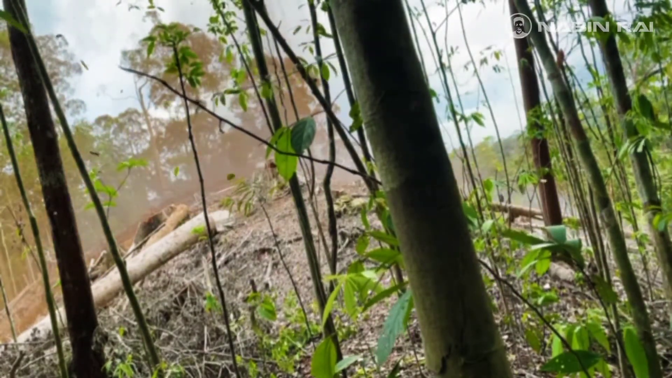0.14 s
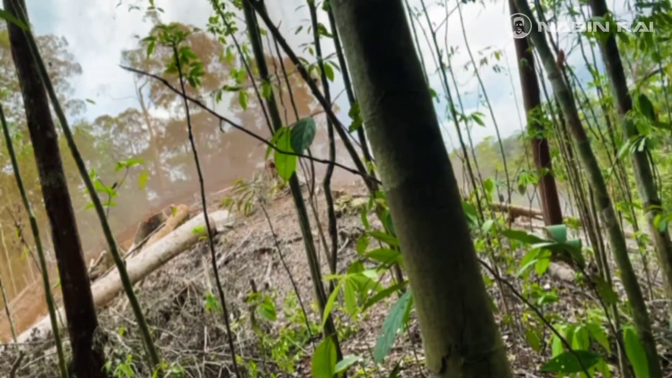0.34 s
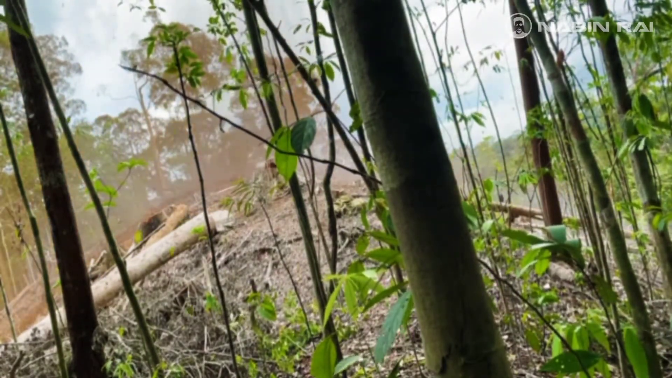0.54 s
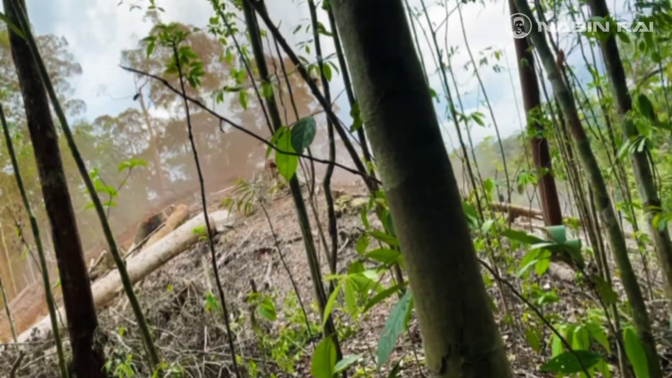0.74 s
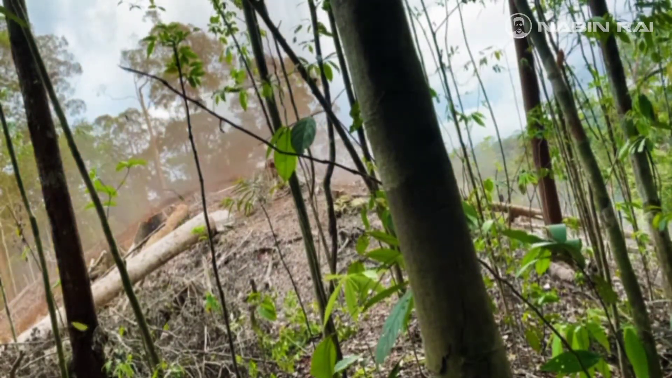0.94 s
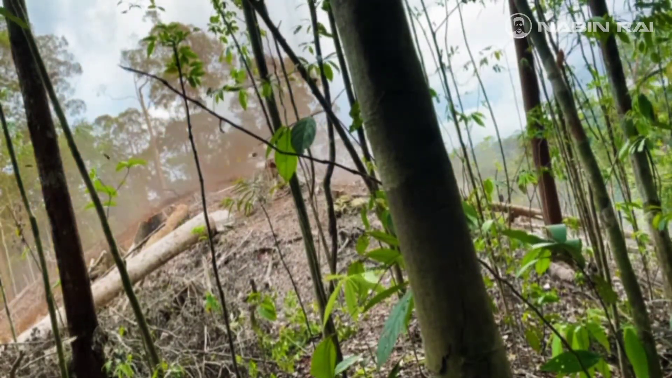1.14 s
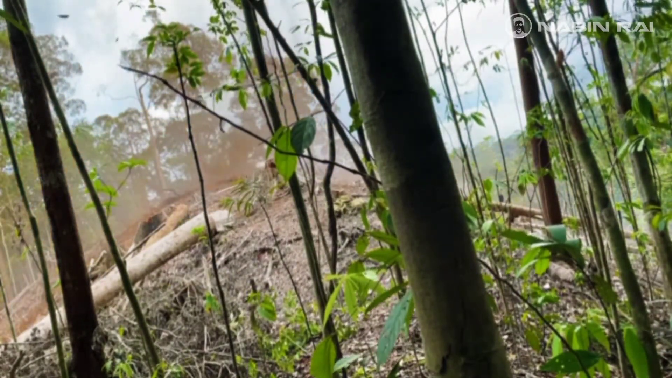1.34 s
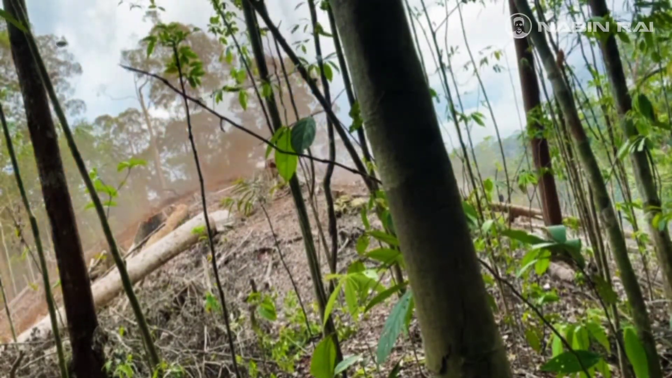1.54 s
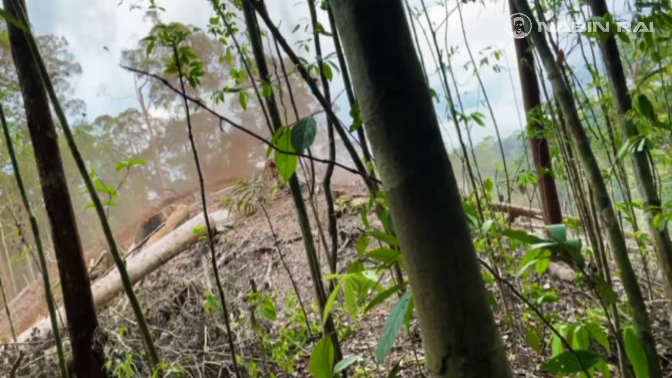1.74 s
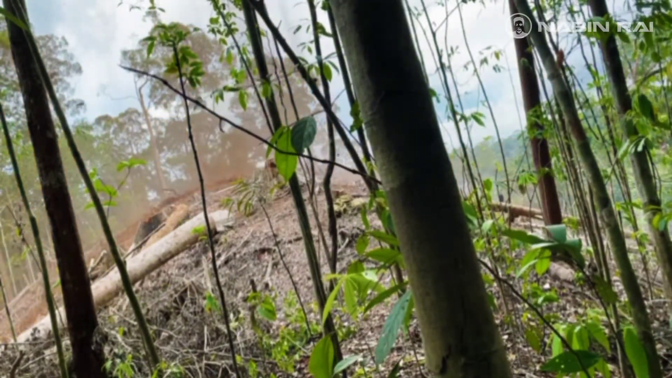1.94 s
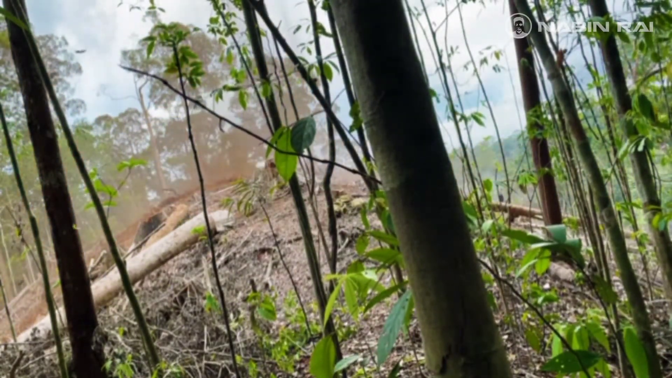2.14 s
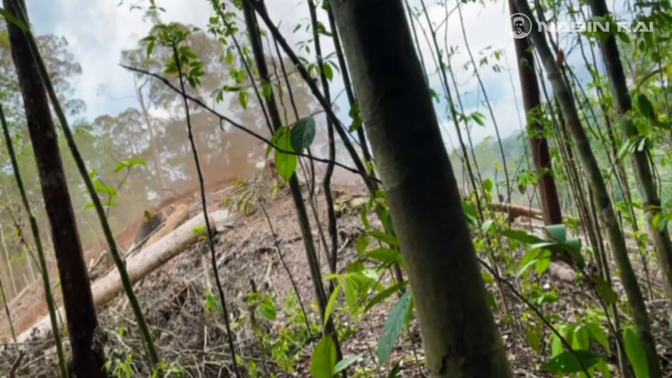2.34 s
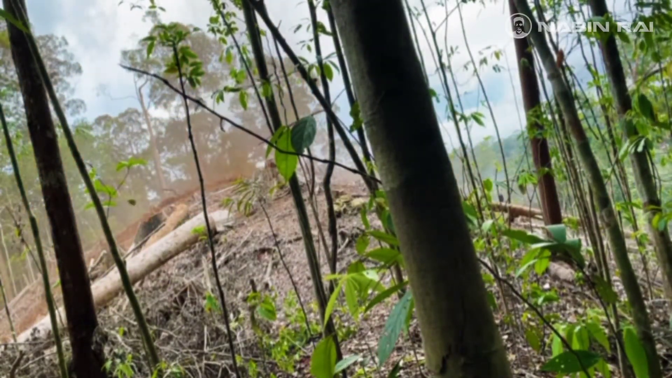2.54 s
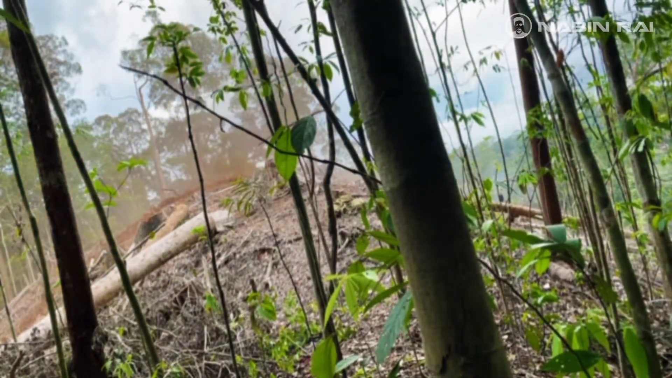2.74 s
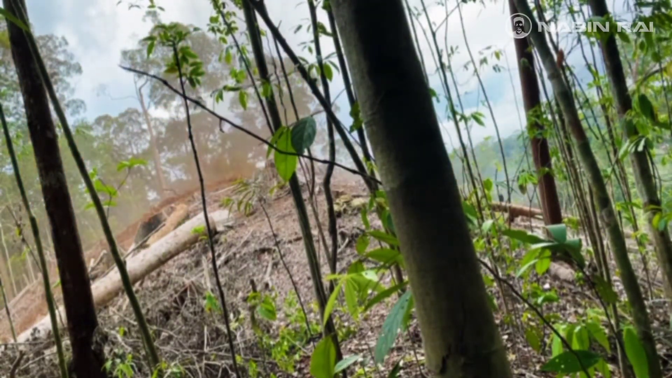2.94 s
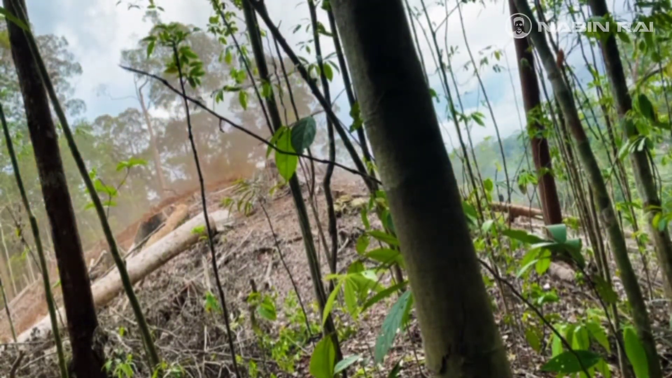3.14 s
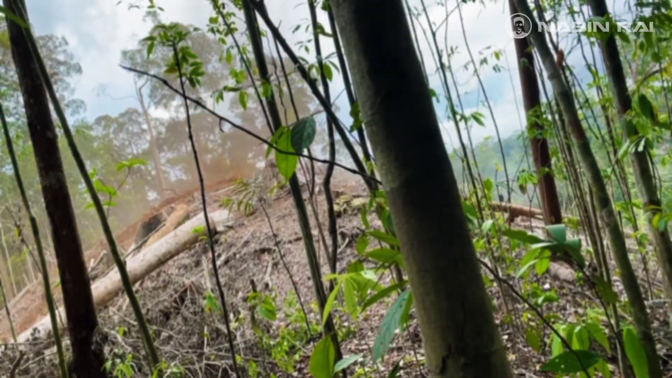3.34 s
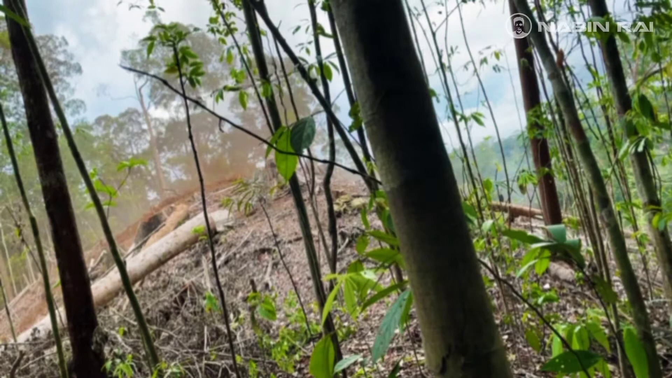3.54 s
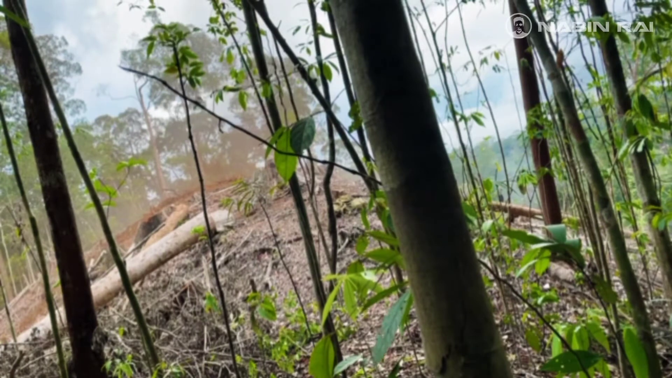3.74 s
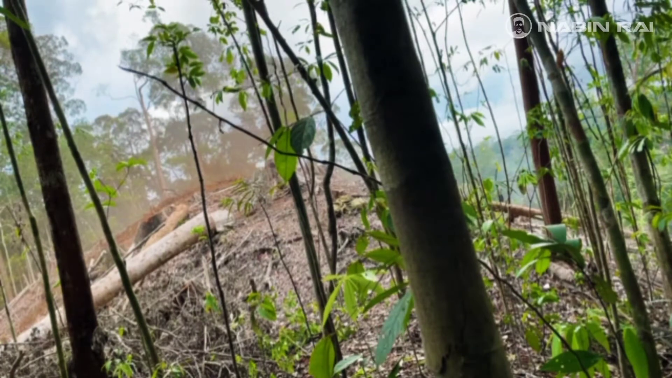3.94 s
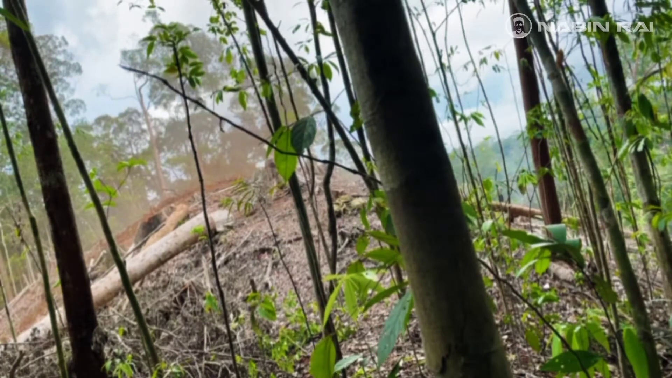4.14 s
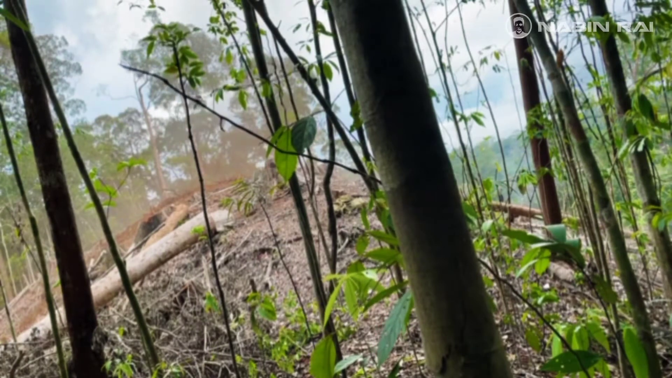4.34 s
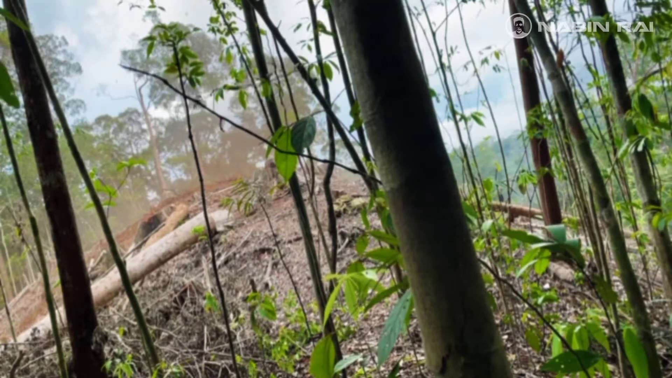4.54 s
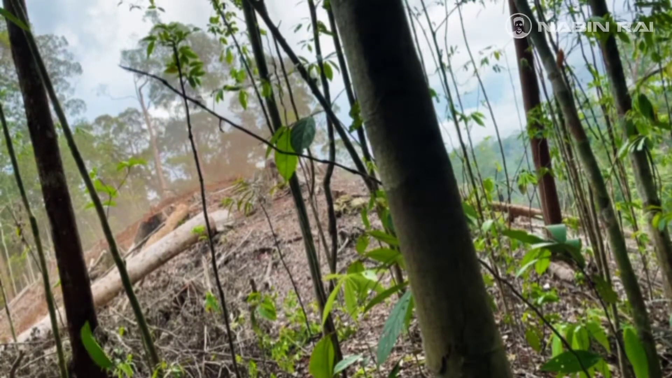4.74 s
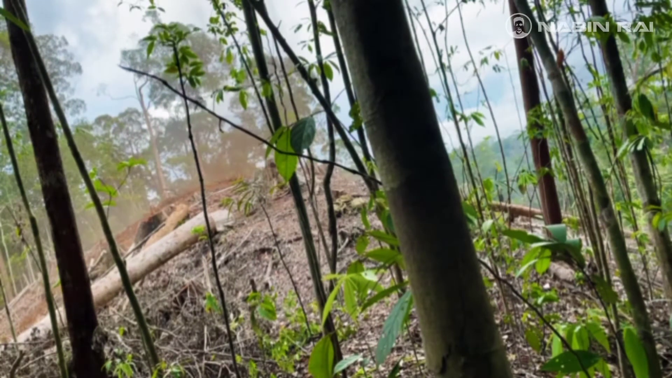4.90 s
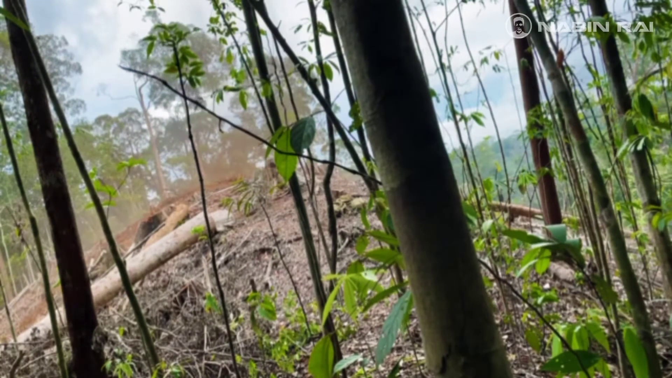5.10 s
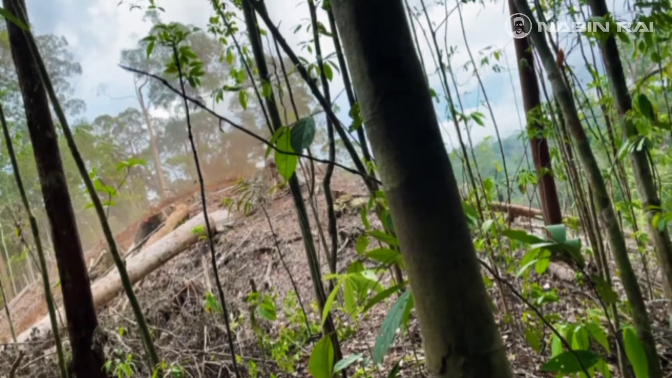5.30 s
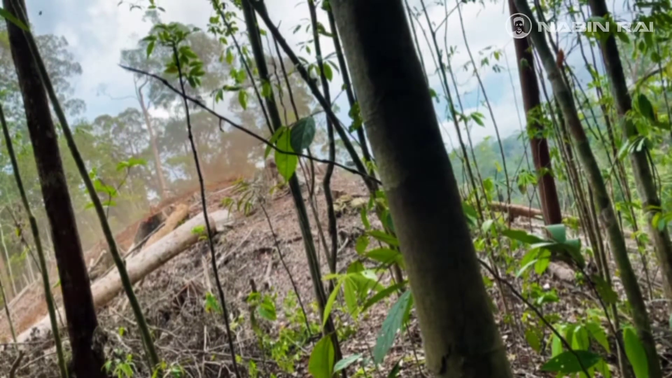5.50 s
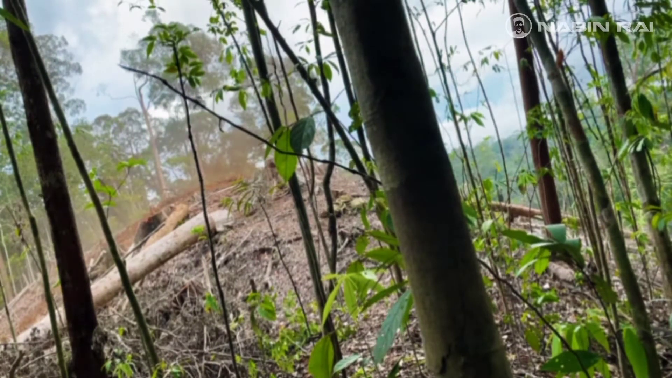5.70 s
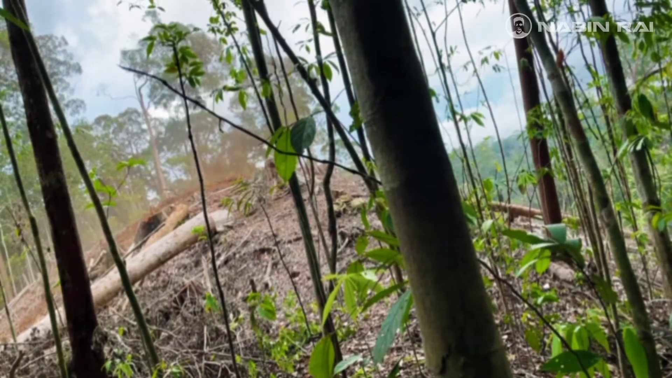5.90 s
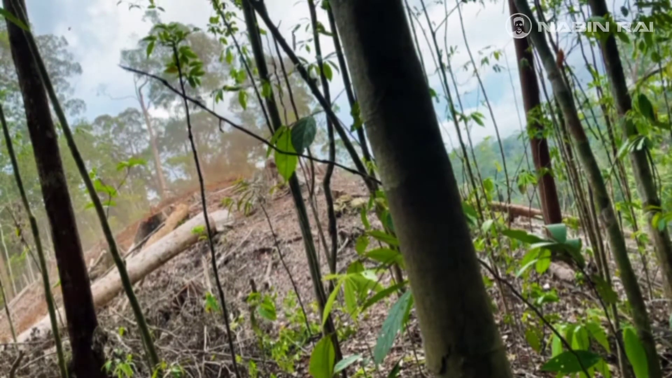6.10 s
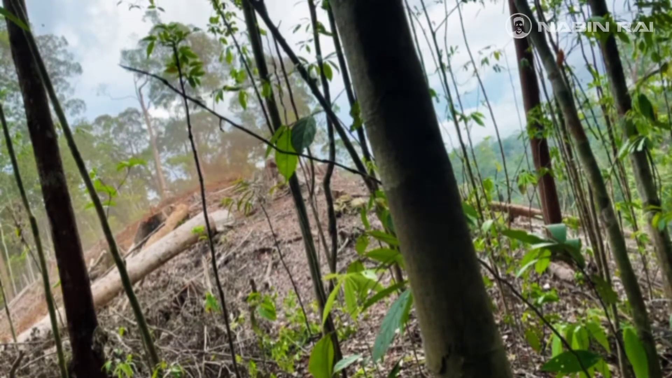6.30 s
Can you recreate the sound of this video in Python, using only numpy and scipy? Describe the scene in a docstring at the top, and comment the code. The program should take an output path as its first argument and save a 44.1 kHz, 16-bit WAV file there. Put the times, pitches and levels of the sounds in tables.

```python
"""Earth thrown up by a blast rains back on a jungle clearing, heard all round a two-port microphone.
Rumble, patter and grit are random clicks over noise, filtered in bands; sticks and leaves ring as resonators.
Near clods thud as damped low swings, lumps burst in sprays of crumbs and pebbles tick as short rings.
The fall is densest at first and thins out, the fine grit hissing longest.
A faint, steady forest drone of filtered noise comes through at the end."""
import sys
import numpy as np
from scipy import signal
from scipy.fft import rfft, irfft, next_fast_len
from scipy.io import wavfile

SR = 44100
rng = np.random.default_rng(int(sys.argv[2]) if len(sys.argv) > 2 else 0)


def wav_record(signal):
    """Record a signal, one row per channel, as 16-bit PCM in the file named by sys.argv[1]."""
    frames = np.transpose(np.atleast_2d(signal))
    bounded = np.clip(frames, -1, 1)
    # unit amplitude maps onto the largest positive 16-bit level
    quanta = np.round(bounded * 32767).astype(np.int16)
    wavfile.write(sys.argv[1], SR, quanta)


N = 280476
TIME = np.arange(N) / SR   # s
# limits of the neighbouring bands in which debris is built, in Hz
BAND_EDGES_HZ = np.r_[np.geomspace(22, 5000, 16), 5800, 6700, 8300, 10000, 12000, 13500, 16500]

# Colour of the heavy earth. Each row: pitch in Hz, relative level in dB per Hz.
RUMBLE_COLOUR = [(25, -19), (40, -12), (60, 1.5), (85, -2.5), (150, -1), (230, -7), (400, -25), (900, -70)]
# Colour of the clods and sticks. Each row: pitch in Hz, relative level in dB per Hz.
PATTER_COLOUR = [(120, -0.5), (250, 0), (380, -1.5), (500, 0), (750, -3.5), (1100, -5.5), (1700, -7),
                 (3000, -9), (6000, -20), (15000, -74)]
# Colour of the fine grit and leaves. Each row: pitch in Hz, relative level in dB per Hz.
GRIT_COLOUR = [(600, -16), (1300, -4.5), (2200, -3.5), (3400, 1.5), (5000, -2), (7000, 0), (9500, -4.5),
               (12000, -14.5), (15000, -4)]
# Heavy clods landing close by. Each row: start in seconds, envelope peak in dB, pitch in Hz.
CLOD_THUDS = [(0.021, -20, 70.4), (.050, -22, 160), (.099, -18, 70), (.116, -18, 71), (0.144, -19, 73.7),
              (0.2112, -11, 161), (0.221, -12.5, 85), (.236, -18.5, 160), (0.265, -21.5, 90),
              (.296, -20, 86), (.342, -16, 206), (.359, -21.5, 80), (.433, -19, 190), (.541, -18, 175),
              (.695, -20, 88), (.728, -22, 90), (0.8549, -9.5, 210), (0.8593, -9, 80), (0.879, -21, 85),
              (.889, -18, 190), (.897, -23, 72), (.912, -16, 168), (.925, -23, 76), (1.241, -17.5, 212),
              (1.271, -19, 75), (1.293, -21, 198), (1.4415, -18.5, 72), (1.465, -19, 83),
              (1.643, -16.5, 61.6), (1.812, -14.5, 160), (2.0398, -9, 73), (2.0438, -12.5, 140),
              (2.077, -23, 78), (2.098, -20, 80), (2.129, -20, 175), (2.224, -22, 160), (2.716, -25, 84),
              (2.898, -28, 92), (2.978, -30, 78), (3.162, -27, 190), (3.463, -29, 163), (3.877, -32.5, 65),
              (4.590, -31, 160), (5.153, -32, 280), (6.243, -25, 55), (6.276, -31, 60.6)]
# Lumps bursting in the leaves or spilling over the ground. Each row: start in seconds,
# level in dB before the rise and decay act, rise in seconds, decay in seconds, treble tilt in dB per octave.
LUMP_BURSTS = [(.112, -28, 0.0044, 0.02, 3), (.115, -29.5, .003, 0.39, -1), (.328, -23, 0.0029, 0.015, -2),
               (.430, -18, 0.0026, 0.012, -2.5), (.521, -27, .0024, 0.011, 5),
               (0.656, -19, .005, 0.045, -2), (.680, -22.5, 0.0034, 0.036, 1.5),
               (.730, -23, 0.0032, 0.023, -4), (0.8356, -17, .0008, 0.022, 0.3),
               (.849, -15.5, 0.004, 0.02, 0.5), (.875, -22.5, .003, 0.043, 1.5),
               (1.592, -21.5, 0.0027, 0.026, -2.5), (2.018, -26, .003, 0.051, -4),
               (2.08, -19.5, 0.0021, 0.027, -4.5), (2.10, -27, .025, 0.19, -7),
               (2.921, -25.5, 0.0027, 0.02, -3.5), (4.116, -23.5, 0.0037, 0.018, 2.5),
               (5.105, -19, 0.009, 0.013, 1), (5.142, -30.5, .0024, 0.02, -1),
               (5.928, -38, .002, 0.018, -2.5), (6.272, -29.5, .006, .012, 7)]
# Colour of the bursts before their tilt. Each row: pitch in Hz, relative level in dB per Hz.
CRUMB_COLOUR = [(150, -11), (280, -8), (500, 2.5), (1500, 0), (3000, -2.5), (6000, -2), (10000, -5),
                (15000, -15.5)]
# Nearest pebbles and small clods on stems and logs. Each row: start in seconds, level in dB,
# pitch in Hz, build-up of the ring in cycles, left minus right in dB.
PEBBLE_TICKS = [(.126, -15, 5000, .9, 5), (.166, -16, 504, .6, 0), (.1665, -13, 1420, 1.2, -1),
                (.207, -15.5, 775, .8, -1), (.229, -15, 1250, 1.1, 3), (.307, -12.5, 875, 0.74, 5),
                (.331, -10.5, 2900, 1.1, -7), (.345, -14, 606, 0.75, -3), (.448, -12, 2800, 0.69, 0),
                (.523, -8, 4230, 0.96, -8), (.586, -15, 546, .9, 0), (.664, -15.5, 380, .8, -1),
                (.666, -16, 1700, 1.2, 4), (.667, -17, 850, .8, 0), (.681, -18, 2300, .7, 5),
                (.685, -12, 460, 0.66, 0), (.686, -14, 1050, 0.59, 0), (.712, -17, 520, .8, 0),
                (.732, -15, 700, 0.54, 0), (.741, -15.5, 433, 1.4, -2), (.743, -12, 2400, 1.1, 0),
                (.758, -18, 450, 0.71, 0), (.8365, -10, 1790, 1.1, -1), (.837, -15.5, 900, 0.73, 0),
                (.847, -12, 1650, 1.2, 0), (.852, -16, 700, 0.49, 0), (.8805, -13.5, 1000, 1.1, 6),
                (1.004, -18, 610, .9, 4), (1.208, -19, 1250, .7, -3), (1.353, -15.5, 3700, 1.2, 0),
                (1.3912, -12, 2520, 0.65, 0), (1.392, -20, 1200, .7, 0), (1.3938, -12, 2600, 0.74, -1),
                (1.424, -20, 494, 1, -2), (1.443, -17, 1900, .8, 0), (1.449, -17, 1500, 0.8, 0),
                (1.522, -18, 1260, .8, -3), (1.596, -20, 3900, .9, 3), (1.606, -20, 1260, 0.64, -7),
                (1.610, -18, 640, 1.1, -3), (1.815, -15, 1140, 0.85, -3), (1.896, -14, 2600, 0.68, 1),
                (1.956, -14, 2300, .6, 2), (1.975, -13, 3500, .8, 3), (2.033, -20, 1450, 0.52, -2),
                (2.047, -19, 1270, .7, 0), (2.082, -15, 3200, 0.72, -3), (2.085, -15.5, 690, 0.98, 0),
                (2.092, -17, 2960, 1.3, -3), (2.094, -17, 430, 1.1, -1), (2.219, -20, 2200, 1, -1),
                (2.335, -19, 2530, .8, -6), (2.380, -15, 2600, .7, 3), (2.410, -17.5, 487, 1.1, -3),
                (2.559, -20, 1200, 0.74, -3), (2.6935, -13, 3900, 1, 0), (2.7455, -18.5, 1750, 1.3, -2),
                (2.839, -15, 2440, 1.2, 0), (2.901, -18.5, 845, 0.66, 5), (2.9255, -15, 2250, 0.73, 2),
                (3.029, -18.5, 1200, .8, -5), (3.0708, -10.5, 1190, 0.86, -5), (3.132, -18, 5070, 0.65, 0),
                (3.242, -18, 4040, 1.3, -2), (3.324, -29, 750, 0.78, -4), (3.396, -24, 1450, .7, -2),
                (3.592, -20, 2200, .6, 0), (3.656, -23.5, 530, 0.99, 0), (3.666, -19, 4300, 1.2, -4),
                (3.840, -23, 6000, 0.83, 2), (3.848, -27, 1160, 0.61, -8), (3.8625, -17, 3280, 1.5, 0),
                (3.910, -21, 1850, .6, -5), (4.036, -29, 530, 1.4, 1), (4.202, -22, 2740, .8, 0),
                (4.258, -18, 4700, 1.6, -10), (4.260, -26, 540, 0.93, -1), (4.395, -25, 2740, 0.74, -8),
                (4.555, -17, 5200, 2, 1), (4.896, -34, 1850, 1.5, 0), (5.0302, -10, 2750, 0.95, -3),
                (5.112, -28.5, 670, 1.3, 5), (5.115, -23, 1700, 0.73, 3), (5.1473, -20.5, 440, 0.66, 0),
                (5.245, -30, 1460, 0.73, -2), (5.467, -32, 1100, .7, -3), (5.686, -24, 1900, 1, -1),
                (5.755, -26, 2000, .8, -10), (5.9242, -19, 1650, 0.92, -8), (5.946, -26, 2700, .6, 1.5),
                (6.206, -25.5, 1770, 1.2, -8), (6.2805, -23, 3480, 2.5, -2)]
# Far-off forest. Each row: centre in Hz, width in Hz, rms level in dB.
FOREST_BANDS = [(175, 150, -52), (1003, 200, -49.5), (1680, 170, -59), (4800, 1100, -50),
                (10300, 3000, -48)]
# Stereo image at the microphone. Each row: pitch in Hz, likeness of left and right from 0 to 1.
PORT_LIKENESS = [(60, 0.97), (150, 0.92), (300, 0.67), (600, 0.1), (1100, 0.34), (2400, 0.25), (3600, 0.47),
                 (4800, 0.54), (6000, 0.64), (7500, 1), (9200, 0.3), (11000, 1), (15000, 0.95)]
# Phase by which the right port leads the left. Each row: pitch in Hz, lead in turns.
RIGHT_PORT_LEAD = [(0, 0), (850, .28), (1200, .26), (2100, .03), (3000, -.13), (3900, 0), (5400, 0),
                   (6700, .48), (8100, .52), (9400, .72), (10100, .98), (12200, 1.03), (13300, 1.5)]
# Level gap between the ports. Each row: pitch in Hz, left minus right in dB.
PORT_LEVEL_GAP = [(60, 1.5), (110, 0.5), (200, 1), (360, 0.5), (650, -1), (1190, -1.5), (1550, -1.5),
                  (1830, -1.5), (2160, 0.5), (3920, 0.5), (4700, 2), (5200, 0.5), (6000, 3), (7130, 1.5),
                  (13000, 0)]

# the dense first wave: extra level, the moment it is half gone in dB, and how gradually it ebbs
FIRST_WAVE_DB, FIRST_WAVE_END_S, FIRST_WAVE_EBB_S = 2, 0.9, 0.14
THINNING_S = 1.57   # time scale on which stragglers thin out once the bulk is down
# each size of debris: level without the first wave, steady fade, time its bulk is down,
# loss each time (1 + time since then / THINNING_S) doubles
RUMBLE_DB, RUMBLE_FADE_DB_PER_S, RUMBLE_DOWN_S, RUMBLE_THINNING_DB = -32.5, 0.08, 2.4, 4.5
PATTER_DB, PATTER_FADE_DB_PER_S, PATTER_DOWN_S, PATTER_THINNING_DB = -26.5, -0.01, 2.3, 10.5
GRIT_DB, GRIT_FADE_DB_PER_S, GRIT_DOWN_S, GRIT_THINNING_DB = -28.5, 0.6859, 3.56, 2
# further pebbles: rate, level without the first wave, spread to either side of it, range of pitch
STRAYS_PER_S, STRAY_DB, STRAY_SPREAD_DB, STRAY_LOW_HZ, STRAY_HIGH_HZ = 27, -24, 3.5, 448, 4350
STRAY_FADE_DB_PER_S, STRAY_THINNING_DB = 3.5, 4
STRAY_CYCLES = 0.99   # middle value of the build-up of their ring
STRAY_PAN_DB = 8   # greatest level gap between the sides


def from_db(db):
    """Decibels to gain."""
    return 10 ** (np.asarray(db) / 20)


def rms_one(x):
    """Scale to rms 1."""
    return x / np.sqrt(np.mean(x ** 2) + 1e-20)


def at_hz(points, hz):
    """Read a table on a log-frequency axis."""
    freqs, values = np.transpose(points)
    return np.interp(np.log(hz), np.log(freqs), values)


def drift(rate_hz):
    """Random wander of spread about 1: noise through a two-pole low-pass at the given rate."""
    step = 40   # samples between the points computed
    pole = np.exp(-2 * np.pi * rate_hz * step / SR)
    noise = rng.standard_normal(N // step + 2002)
    slow = signal.lfilter([1], [1, -2 * pole, pole * pole], noise)[2000:]   # settled part
    return np.interp(np.arange(N) / step, np.arange(len(slow)), rms_one(slow))


def band(x, low, high):
    """Causal band-pass."""
    sections = signal.butter(2, [low, min(high, .45 * SR)], "band", fs=SR, output="sos")
    return signal.sosfilt(sections, x + 1e-18)


def spread(pair, hz):
    """Two unrelated signals become left and right, as alike as the ports hear that pitch."""
    alike = np.clip(at_hz(PORT_LIKENESS, hz), 0, .995)
    middle = np.sqrt(1 + alike) * pair[0]
    side = np.sqrt(1 - alike) * pair[1]
    return middle + side * np.array([[1], [-1]])


def impacts(per_s, size_db):
    """Two channels of clicks at random times: many small or far, a few large or near; rms 1."""
    at = np.flatnonzero(rng.random(N) < per_s / SR)
    size = from_db(size_db * np.minimum(rng.exponential(1, len(at)), 4.5))
    bearing = rng.uniform(0, 2 * np.pi, len(at))
    clicks = np.zeros((2, N))
    clicks[:, at] = size * np.array([np.cos(bearing), np.sin(bearing)])
    return rms_one(clicks)


def swing(t, hz, swell_s):
    """A damped swing whose envelope builds up to 1 while the contact lasts, then dies away."""
    envelope = (t / swell_s) ** 2 * np.exp(2 - 2 * t / swell_s)
    return envelope * np.sin(2 * np.pi * hz * t)


def falling(t, db, fade_db_per_s, down_s, thinning_db):
    """Gain of one size of debris: dense first wave, steady slope, power-law thinning once its bulk is down."""
    first_wave = FIRST_WAVE_DB * (1 - np.tanh((t - FIRST_WAVE_END_S) / FIRST_WAVE_EBB_S)) / 2
    doublings = np.log2(1 + np.maximum(t - down_s, 0) / THINNING_S)
    return from_db(db + first_wave - fade_db_per_s * t - thinning_db * doublings)


def shower(colour, per_s, size_db, wash_db, clump_db, patchy_db):
    """Impacts, each sounding over about two bands, on the smooth wash of countless far ones; rms 1."""
    out = np.zeros((2, N))
    clumps = drift(16.4)
    wash = rng.standard_normal((2, 2, N))
    lower = impacts(per_s, size_db)
    for k, (low, high) in enumerate(zip(BAND_EDGES_HZ, BAND_EDGES_HZ[1:])):
        hz = np.sqrt(low * high)
        if not colour[0][0] / 2 < hz < colour[-1][0] * 2:
            continue
        upper = impacts(per_s, size_db)   # shared with the next band up
        drive = (lower + upper) * (-1) ** k + from_db(wash_db) * wash[k % 2]
        level = from_db(at_hz(colour, hz) + patchy_db * drift(6.7))
        out += level * band(spread(drive, hz), low, high)
        lower = upper
    return rms_one(out * from_db(clump_db * clumps))


def twigs(colour, low_hz, high_hz, per_s, cycles, size_db, count):
    """Struck twigs and dry leaves ring briefly as resonators, each at its own pitch; rms 1."""
    out = np.zeros((2, N))
    for hz in np.geomspace(low_hz, high_hz, count):
        pole = np.exp(-hz / (cycles * SR))
        turn = 2 * np.pi * hz / SR
        strikes = spread(impacts(per_s / count, size_db), hz) + 1e-18
        ring = signal.lfilter([1, 0, -1], [1, -2 * pole * np.cos(turn), pole * pole], strikes)
        out += from_db(at_hz(colour, hz)) * np.sqrt(hz) * rms_one(ring)
    return rms_one(out)


def strays():
    """Further pebbles tick with random moment, size, pitch and side, growing fainter as the fall thins."""
    when, size, pitch, ring, side = rng.random((int(STRAYS_PER_S * N / SR), 5)).T
    level_db = STRAY_SPREAD_DB * (2 * size - 1)
    hz = STRAY_LOW_HZ * (STRAY_HIGH_HZ / STRAY_LOW_HZ) ** pitch
    cycles = STRAY_CYCLES * (.5 + ring)
    pan_db = STRAY_PAN_DB * (2 * side - 1)
    pebbles = zip(when * TIME[-1], level_db, hz, cycles, pan_db)
    fall = falling(TIME, STRAY_DB, STRAY_FADE_DB_PER_S, PATTER_DOWN_S, STRAY_THINNING_DB)
    return fall * ticks(pebbles)


def forest():
    """Distant drone and shrill: a few steady bands of noise."""
    out = np.zeros((2, N))
    for hz, width, db in FOREST_BANDS:
        noise = spread(rng.standard_normal((2, N)), hz)
        out += from_db(db) * rms_one(band(noise, max(hz - width / 2, 20), hz + width / 2))
    return out


def thuds(swell_cycles=0.55):
    """A clod pushes the soft ground, which swings once or twice and stops; lower ones swing slower."""
    out = np.zeros(N)
    for start, db, hz in CLOD_THUDS:
        place = out[int(start * SR):][:SR // 4]
        place -= from_db(db) * swing(TIME[:len(place)], hz, swell_cycles / hz)   # first push is negative
    return out


def bursts(crumbs_per_s=4200, crumb_db=3.5):
    """A lump breaks into a spray of crumbs that dies away; its treble tilt sets how bright it sounds."""
    centres = np.sqrt(BAND_EDGES_HZ[1:] * BAND_EDGES_HZ[:-1])[4:]
    lows, highs = BAND_EDGES_HZ[-len(centres) - 1:-1], BAND_EDGES_HZ[-len(centres):]
    out, power, t = np.zeros((2, N)), np.zeros((len(centres), N)), TIME[:SR]
    for start, db, rise, decay, tilt in LUMP_BURSTS:
        colour = from_db(at_hz(CRUMB_COLOUR, centres) + tilt * np.log2(centres)) ** 2
        colour /= np.sum(colour * (highs - lows)) / (SR / 2)   # tilt leaves the total power alone
        shape = from_db(db) * (1 - np.exp(-t / rise)) * np.exp(-t / decay)
        place = power[:, int(start * SR):][:, :len(t)]
        place += np.outer(colour, shape ** 2)[:, :place.shape[1]]
    crumbs = [impacts(crumbs_per_s, crumb_db), impacts(crumbs_per_s, crumb_db)]
    for k, hz in enumerate(centres):
        spray = spread(crumbs[k % 2], hz) * np.sqrt(power[k])
        out += band(spray, lows[k], highs[k])
    return out


def ticks(pebbles, rebound_s=0.00326, rebound_db=-12, scatter_db=-20, scatter_s=0.014, scatter_octaves=0.85):
    """Damp wood rings for a few cycles, the pebble rebounds once, and stems and leaves scatter a short tail."""
    out, t = np.zeros((2, N)), TIME[:SR // 10]
    reach = 2 ** (scatter_octaves / 2)
    for start, db, hz, cycles, pan_db in pebbles:
        strike = swing(t, hz, cycles / hz)
        rebound = swing(np.maximum(t - rebound_s, 0), hz, cycles / hz)
        knock = strike + from_db(rebound_db) * rebound
        sides = rms_one(from_db([[pan_db / 2], [-pan_db / 2]]))
        noise = band(rng.standard_normal((2, len(t))), hz / reach, hz * reach)
        tail = rms_one(noise) * np.exp(-t / scatter_s)
        tick = from_db(db) * (sides * knock + from_db(scatter_db) * tail)
        place = out[:, int(start * SR):][:, :len(t)]
        place += tick[:, :place.shape[1]]
    return out


def across_ports(sound):
    """Sound from all round reaches the two microphone ports with a phase gap that changes with pitch."""
    size = next_fast_len(N + SR // 10)
    hz = np.arange(size // 2 + 1) * SR / size
    turns = np.interp(hz, *np.transpose(RIGHT_PORT_LEAD))
    shift = np.exp(-1j * np.pi * turns * np.array([[1], [-1]]))   # half the gap on each side
    return irfft(rfft(sound, size) * shift, size)[:, :N]


def scene(sticks_db=-4.5, leaves_db=-7):
    """Earth, clods and grit fall together; the grit is the last to thin out, over the far forest."""
    earth = falling(TIME, RUMBLE_DB, RUMBLE_FADE_DB_PER_S, RUMBLE_DOWN_S, RUMBLE_THINNING_DB)
    clods = falling(TIME, PATTER_DB, PATTER_FADE_DB_PER_S, PATTER_DOWN_S, PATTER_THINNING_DB)
    fines = falling(TIME, GRIT_DB, GRIT_FADE_DB_PER_S, GRIT_DOWN_S, GRIT_THINNING_DB)
    rumble = earth * shower(RUMBLE_COLOUR, per_s=120, size_db=2.0, wash_db=1.5, clump_db=1.5, patchy_db=1.0)
    patter = clods * shower(PATTER_COLOUR, per_s=300, size_db=3.0, wash_db=1, clump_db=1.08, patchy_db=0.0)
    struck_sticks = twigs(PATTER_COLOUR, 328.9, 1909, per_s=500, cycles=16.0, size_db=1.0, count=36)
    sticks = clods * from_db(sticks_db) * struck_sticks
    grit = fines * shower(GRIT_COLOUR, per_s=700, size_db=1.0, wash_db=3.5, clump_db=1.0, patchy_db=1.7)
    struck_leaves = twigs(GRIT_COLOUR, 1797, 6804, per_s=1000, cycles=53.0, size_db=1.9, count=44)
    leaves = fines * from_db(leaves_db) * struck_leaves
    around = rumble + patter + sticks + grit + leaves + strays() + forest() + bursts()
    return across_ports(around) + thuds() + ticks(PEBBLE_TICKS)   # the nearest hits reach both ports in step


def record(dry, low_cut_hz=36, top_cut_hz=13500):
    """The two microphone ports differ in level with pitch; the deep bass and the top are cut."""
    size = next_fast_len(N + SR // 10)
    hz = np.arange(size // 2 + 1) * SR / size
    ports = from_db(np.array([[1], [-1]]) * at_hz(PORT_LEVEL_GAP, hz + 1) / 2)
    heard = irfft(rfft(dry, size) * ports, size)[:, :N]
    heard = signal.sosfilt(signal.butter(4, low_cut_hz, "high", fs=SR, output="sos"), heard)
    return signal.sosfilt(signal.ellip(12, .2, 80, top_cut_hz, fs=SR, output="sos"), heard)


dry = scene()
out = record(dry)
wav_record(out)
```